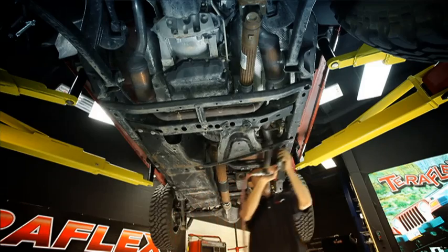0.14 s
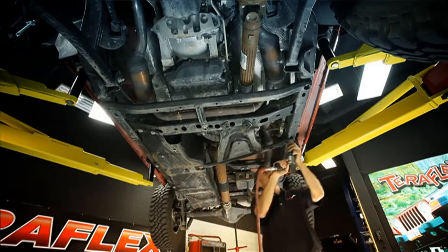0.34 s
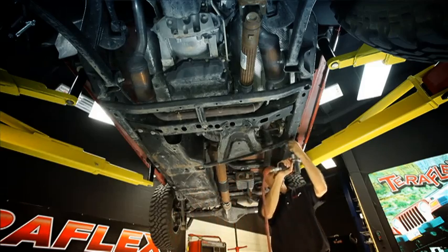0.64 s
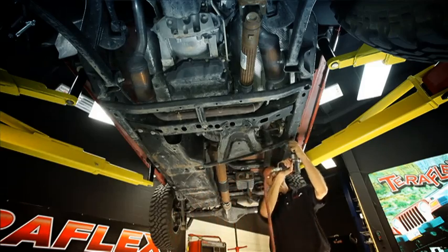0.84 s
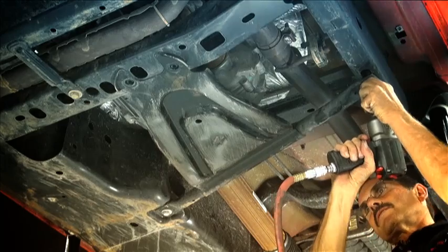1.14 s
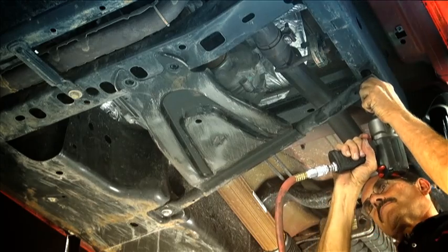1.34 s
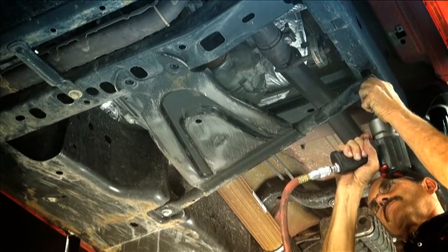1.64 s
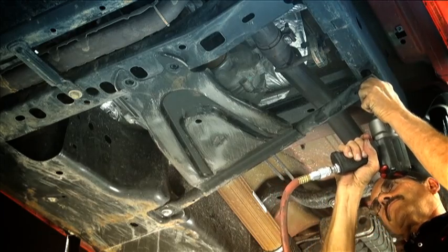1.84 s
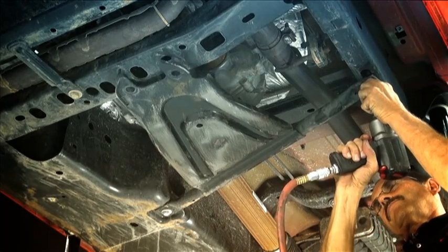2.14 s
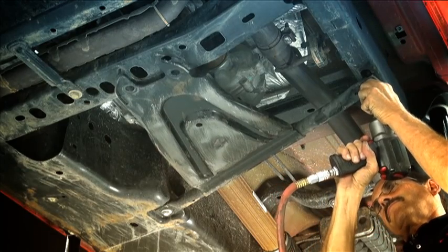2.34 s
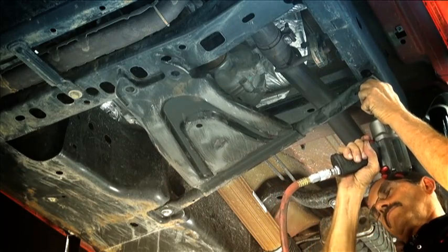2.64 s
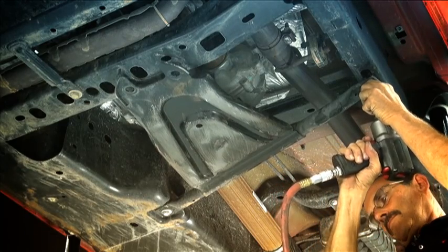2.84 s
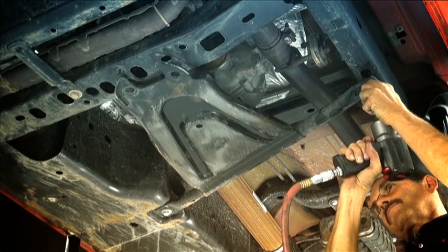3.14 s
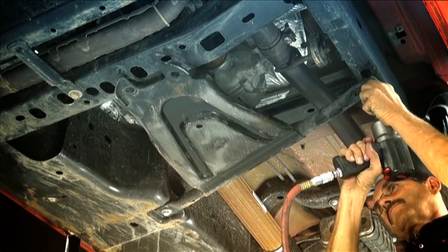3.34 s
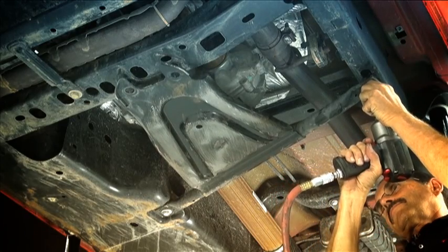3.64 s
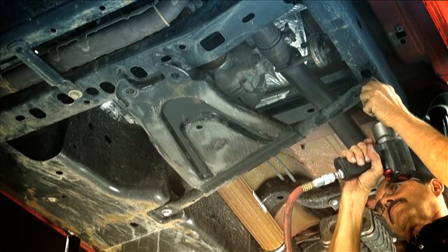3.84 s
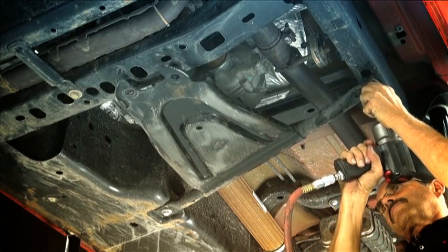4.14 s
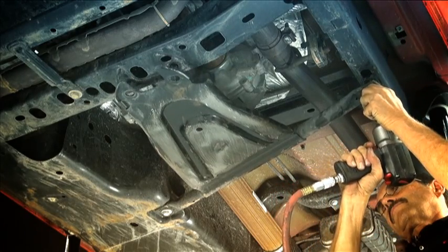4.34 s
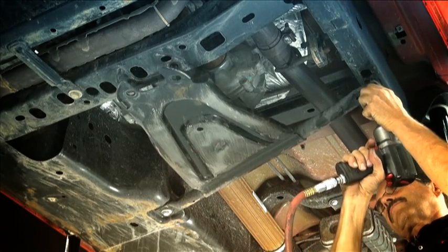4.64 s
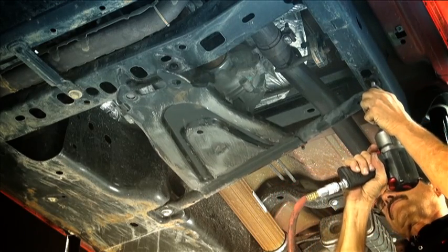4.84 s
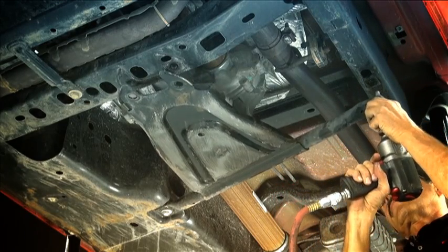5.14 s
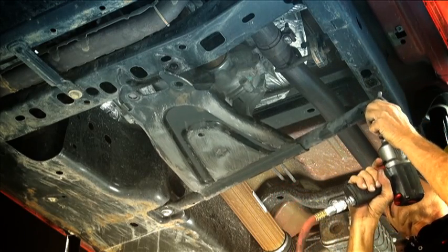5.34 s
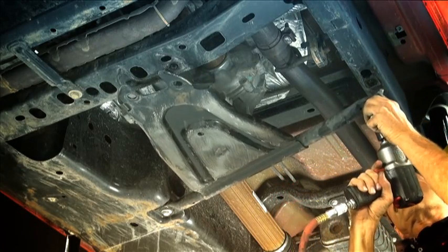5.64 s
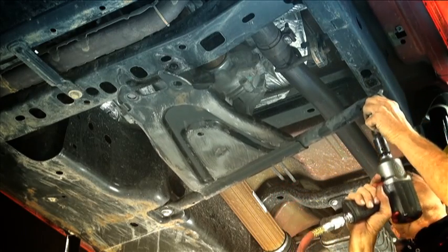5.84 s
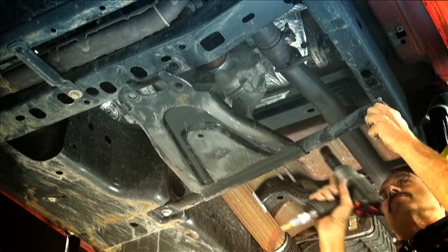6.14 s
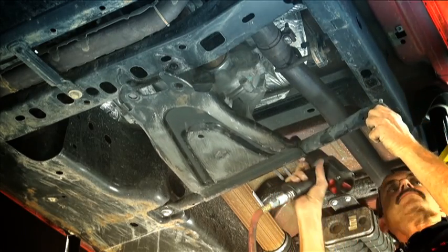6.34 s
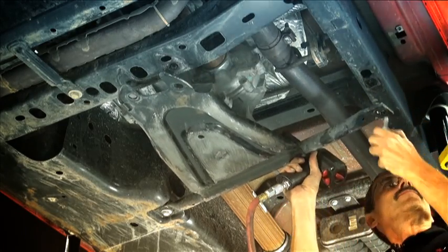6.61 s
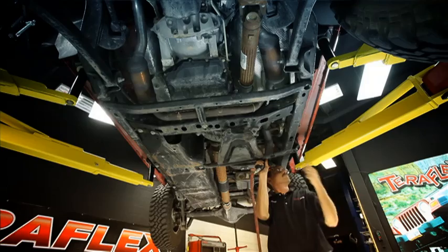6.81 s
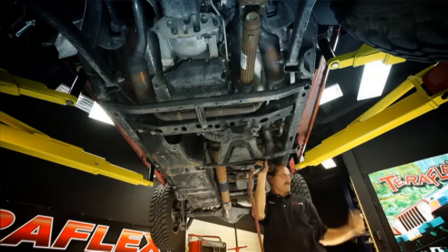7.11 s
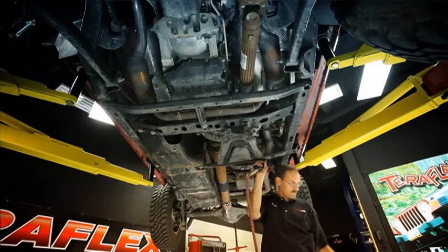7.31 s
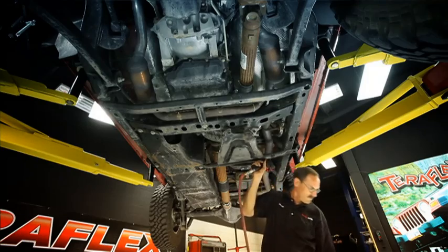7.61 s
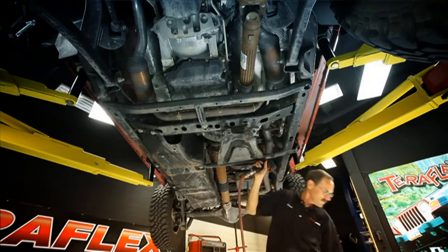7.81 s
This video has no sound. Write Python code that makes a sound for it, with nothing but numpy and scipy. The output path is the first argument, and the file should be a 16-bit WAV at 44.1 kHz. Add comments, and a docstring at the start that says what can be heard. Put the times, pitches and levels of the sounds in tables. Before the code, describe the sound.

A socket clanks on, a pneumatic wrench bursts into harsh stuttering hammering twice, then stops, leaving faint ticks, dull knocks and low garage rumble.

```python
"""An air impact wrench undoes a bolt under a lifted truck: in two long runs its vane motor drives a hammer.
Most turns have a kick, two or four rattling blasts, and quickening puffs before the last blast.
Blasts are shaped noise and steel modes, longer and duller the harder the bolt resists; each blow stalls the motor.
First the socket clanks onto the bolt; it pings late in the hammering, then short rattling blips and ticks follow.
Air hisses from the start; dull knocks and a thin squeak come late; the reverberant garage rumbles and hums."""
import sys
import numpy as np
from scipy import signal
from scipy.fft import rfft, irfft
from scipy.io import wavfile

SR = 44100
rng = np.random.default_rng(int(sys.argv[2]) if len(sys.argv) > 2 else 0)


def pcm_store(signal):
    """Save signal as 16-bit PCM."""
    levels = np.round(np.clip(np.atleast_2d(signal), -1, 1) * 32767)
    wavfile.write(sys.argv[1], SR, levels.astype(np.int16).T)


N = 351477
TIME = np.arange(N) / SR   # seconds


def amp(db):
    """Level law: decibels become an amplitude ratio."""
    return 10 ** (np.asarray(db) / 20)


def rms_one(x):
    """Normalization to unit effective value."""
    return x / np.sqrt(np.mean(x ** 2) + 1e-20)


def in_time(rows):
    """Linear interpolation: each column of a curve, sample by sample."""
    s, *columns = np.transpose(rows)
    return [np.interp(TIME, s, c) for c in columns]


def at_hz(points, hz):
    """Interpolation along a logarithmic frequency axis."""
    point_hz, values = np.array(points).T
    return np.interp(np.log(hz + 1), np.log(point_hz), values)


def drift(rate):
    """Slow random modulation: normal random knots, rate per second, joined by lines."""
    knots = rng.standard_normal(int(rate * N / SR) + 2)
    return np.interp(TIME * rate, np.arange(len(knots)), knots)


def clicks(times, db):
    """Impulse excitation: one-sample clicks."""
    out = np.zeros(N)
    out[np.round(np.asarray(times) * SR).astype(int)] = amp(db)
    return out


def cut(x, hz, kind):
    """Band limiting by a second-order Butterworth filter design."""
    return signal.sosfilt(signal.butter(2, hz, kind, fs=SR, output="sos"), x + 1e-18)


def colour(x, spectrum, size=2048):
    """Minimum-phase filtering: the folded cepstrum makes it causal; white noise keeps its level."""
    bin_hz = np.arange(size // 2 + 1) * SR / size
    cepstrum = irfft(np.log(amp(at_hz(spectrum, bin_hz))))
    cepstrum[1:size // 2] *= 2
    cepstrum[size // 2 + 1:] = 0
    response = irfft(np.exp(rfft(cepstrum)))
    return signal.oaconvolve(x, response / np.linalg.norm(response))[:N]


def ring(x, hz, width_hz):
    """Damped resonance: a unit click starts a decaying sine of initial height 1."""
    r, w = np.exp(-np.pi * width_hz / SR), 2 * np.pi * hz / SR
    return signal.lfilter([0, np.sin(w)], [1, -2 * r * np.cos(w), r * r], x + 1e-18)


def body(x, modes, size=4096):
    """Modal superposition: parallel resonances of alternating sign; white noise keeps its level."""
    t, response = TIME[:size], 0
    for k, (hz, width, db) in enumerate(modes):
        decay = width * np.exp(-np.pi * width * t)
        response = response + (-1) ** k * amp(db) * decay * np.cos(2 * np.pi * hz * t)
    return signal.oaconvolve(x, response / np.linalg.norm(response))[:N]


def bursts(rows, rise_s, fall_s, sag_db, size=8000):
    """Energy addition: mid and treble envelopes rise sharply, change by -sag_db over their length and decay."""
    out, t = np.zeros((2, N + size)), TIME[:size]
    for s, db, length, treble_db in rows:
        sag = amp(sag_db * (.5 - np.minimum(t / length, 1)))
        shape = (1 - np.exp(-t / rise_s)) * sag * np.exp(-np.maximum(t - length, 0) / fall_s)
        at = round(s * SR)
        out[:, at:at + size] += (amp([[db], [db + treble_db]]) * shape) ** 2
    return np.sqrt(out[:, :N])


def chatter(envelopes, split_hz, grain_db):
    """Random contact excitation: uneven noise under a mid and a treble envelope."""
    noise = rng.standard_normal((2, N)) * amp(grain_db * drift(1500))
    mid, treble = rms_one(noise) * envelopes
    return cut(mid, split_hz, "low") + cut(treble, split_hz, "high")


def struck(rows, spectrum, modes, split_hz, fall_s, ring_db):
    """Impact excitation: chattering contact gives a broad crack and rings the part's modes."""
    envelopes = bursts(rows, rise_s=0.00033, fall_s=fall_s, sag_db=4.0)
    contact = chatter(envelopes, split_hz, grain_db=4.0)
    return amp(-5.5) * colour(contact, spectrum) + amp(ring_db) * body(contact, modes)


# Spectrum of the air hiss. Each row: frequency in Hz, relative level in dB.
LEAK = [(500, -22.5), (3000, -12), (6500, -6.5), (8500, -7.5), (12000, -4), (16000, -3)]
# Spectrum of the shop's rumble. Each row: frequency in Hz, relative level in dB.
SHOP = [(25, -20.5), (45, -3.5), (65, -1), (110, -0.5), (170, -5.5), (260, -14), (450, -14), (900, -25.5),
        (2000, -33), (6000, -41), (16000, -56.5)]
# Steady hum tones. Each row: frequency in Hz, relative level in dB.
HUM = [(118.4, -62.5), (220.7, -74.5), (344.5, -76)]
# Background course. Each row: time in seconds, relative air hiss level in dB (leak and the motor's rush),
# shop noise level in dB.
BACKGROUND = [(0, -52.5, -57.5), (.795, -51, -50.5), (.83, -33.5, -41), (1, -41, -56), (2.45, -58.5, -56),
              (2.64, -47, -54.5), (4.7, -61, -55.5), (5, -64, -62.5), (5.3, -61, -60), (5.7, -53, -53),
              (6.05, -54.5, -57), (6.18, -71.5, -53), (7.2, -76, -57), (7.55, -73.5, -47), (7.8, -74, -53),
              (7.97, -58, -49)]


def background():
    """Comb interference: leaking and rushing air meets its shifting underbody reflection; the shop hums."""
    hiss_db, shop_db = in_time(BACKGROUND)
    hiss = colour(rng.standard_normal(N), LEAK)
    delay_s = .0007 * amp(1.2 * drift(2))
    hiss = hiss + .27 * np.interp(TIME - delay_s, TIME, hiss)
    rumble = colour(rng.standard_normal(N), SHOP, size=8192)
    hum = sum(amp(db + 2 * drift(3.2)) * np.sqrt(2) * np.sin(2 * np.pi * hz * TIME) for hz, db in HUM)
    return amp(hiss_db) * hiss + amp(shop_db) * rumble + amp(0.5) * hum


# Clanks of socket on bolt. Each row: start in seconds, relative level in dB, length in seconds,
# treble over mid in dB.
CLANKS = [(0.3258, -16.5, 0.0043, -7), (0.4420, -23, 0.007, 1), (0.4834, -14.5, 0.0065, -1)]
# Spectrum of the crack. Each row: frequency in Hz, relative level in dB.
CLANK = [(150, -7), (550, -11.5), (950, -0.5), (2000, -1.5), (3500, -3), (5700, -8), (7000, -18.5),
         (9500, -28), (16000, -33)]
# Modes of the struck parts. Each row: frequency in Hz, width in Hz, relative level in dB.
CLANK_MODES = [(970, 140, -5.5), (1074, 80, -4), (1600, 98, -16), (1790, 30, 8.5), (1950, 89, -1),
               (2420, 28, -4.5), (3420, 210, -7.5), (4670, 73, -9), (6030, 90, -9.5)]


def clanks():
    """Impact excitation: the socket strikes the bolt and rings its modes."""
    return struck(CLANKS, CLANK, CLANK_MODES, split_hz=2700, fall_s=0.014, ring_db=-10)


# Resistance of the bolt. Each row: time in seconds, load from 0 to 1.
LOAD = [(.89, 0.7), (.95, 1), (1.3, 0.95), (1.93, 0.87), (2.15, 0.46), (2.75, 0.78), (3.23, .72),
        (3.45, 0.52), (4.45, 0.41)]


def load_at(s):
    """Mechanical load: the bolt's resistance at a moment."""
    return np.clip(np.interp(s, *np.transpose(LOAD)), .1, 1.2)


# Turns of the hammer with one, two or four blows. Each row: time of the full blow in seconds,
# relative level in dB.
SINGLE_TURNS = [(.871, -22.5), (2.254, -25), (2.305, -24), (2.823, -26.5), (4.492, -21.5)]
DOUBLE_TURNS = [(.944, -17), (1.022, -18), (1.093, -16), (1.163, -17.5), (1.233, -17), (1.302, -17),
                (1.381, -19), (1.459, -19), (1.53, -18), (1.602, -15.5), (1.682, -17.5), (1.763, -19.5),
                (1.847, -18.5), (1.933, -19), (2.023, -19.5), (2.12, -19.5), (2.189, -19), (3.913, -19.5),
                (3.987, -20), (4.065, -20), (4.133, -21), (4.207, -21.5), (4.278, -20.5), (4.364, -20.5),
                (4.451, -20.5)]
FOURFOLD_TURNS = [(2.748, -20.5), (2.962, -23.5), (3.095, -23), (3.233, -23), (3.369, -23), (3.508, -20.5),
                  (3.616, -20.5), (3.709, -20.5), (3.845, -19)]
# The blows of one turn. Each row: lead before the full blow's time in seconds, relative level in dB,
# length in seconds at full load, treble over mid in dB at full load.
SINGLE = [(0, 0.5, .012, -4.5)]
DOUBLE = [(.0335, -1.6, .022, -3), (0.00034, 0, 0.031, -0.5)]
FOURFOLD = [(.076, -1.5, 0.0053, -3.5), (.0495, -1, .007, -4), (.038, -2.5, 0.0064, -2.5),
            (0.0016, 0.5, 0.023, -3)]
EASY_TREBLE_DB = 4   # blows brighten by this much as the load goes


def blows():
    """Load dependence: harder turns last longer and are duller. Rows (s, dB, length s, treble dB)."""
    kinds = (SINGLE_TURNS, SINGLE), (DOUBLE_TURNS, DOUBLE), (FOURFOLD_TURNS, FOURFOLD)
    rows = []
    for turns, pattern in kinds:
        for s, db in turns:
            load = load_at(s)
            for lead, blow_db, length, treble_db in pattern:
                treble = treble_db + EASY_TREBLE_DB * (1 - load)
                rows.append((s - lead, db + blow_db, length * load, treble))
    return rows


# after a full blow the motor sinks for the stall time, then picks up (seconds)
SINGLE_STALL_S, DOUBLE_STALL_S, FOURFOLD_STALL_S, RECOVER_S = 0.05, .028, 0.061, 0.024


def drag():
    """Braking by load: each full blow drags the motor down, more under load, until it picks up again."""
    kinds = ((SINGLE_TURNS, SINGLE_STALL_S), (DOUBLE_TURNS, DOUBLE_STALL_S),
             (FOURFOLD_TURNS, FOURFOLD_STALL_S))
    total = 0
    for turns, stall_s in kinds:
        for s, db in turns:
            times = [s, s + stall_s, s + stall_s + RECOVER_S]
            total = total + np.interp(TIME, times, [0, load_at(s), 0])
    return total


# The motor revs up and runs down. Each row: time in seconds, relative chug level in dB,
# exhaust tone level in dB.
FIRST_RUN = [(.76, -90, -97), (.80, -52.5, -47.5), (.835, -38.5, -35), (.9, -25.5, -31.5), (1.25, -24, -28),
             (1.8, -28, -31.5), (2.19, -25.5, -24.5), (2.32, -40.5, -33), (2.36, -67, -59)]
SECOND_RUN = [(2.655, -61, -55.5), (2.68, -29.5, -30), (3.4, -32.5, -34.5), (3.85, -28.5, -31),
              (4.1, -30.5, -26), (4.42, -33, -23.5), (4.521, -33, -35), (4.57, -37.5, -42),
              (4.63, -83, -81)]
# Exhaust resonances, the tone's also used by the wind-up. Each row: frequency in Hz, width in Hz,
# relative level in dB.
EXHAUST_LOW = [(110, 34, -2.5), (190, 230, -11.5), (283, 120, -3), (385, 60, 0.5), (516, 200, -8),
               (697, 96, -6)]
EXHAUST_TONE = [(918, 200, -2), (1053, 106, 4), (1138, 110, 0.5), (1770, 430, -11.5)]
# Spectrum of rushing air, also of the hammer's blasts. Each row: frequency in Hz, relative level in dB.
BLAST = [(200, -3), (600, 1), (1600, 1.5), (2600, -5.5), (3700, 0), (4700, -0.5), (5800, -5), (7600, -2),
         (8800, -5.5), (10000, -3), (11400, -9.5), (13000, -8), (16000, -17.5)]
STALL_CHUG_DB, STALL_TONE_DB = 16, 10   # how far each sinks at full load
FREE_VANE_HZ, VANE_SAG_HZ = 495.3, 329.9   # vanes per second with no load; how many fewer at full load
VANE_WOBBLE_DB = 3   # unsteadiness of the speed at full load


def motor():
    """Periodic pulse excitation: each vane puffs into the resonant exhaust; the blows stall the motor."""
    drive_db, exhaust_db = in_time(FIRST_RUN + SECOND_RUN)
    dragged = drag()
    chug_db = drive_db - STALL_CHUG_DB * dragged
    tone_db = exhaust_db - STALL_TONE_DB * dragged
    blow_rows = [(s, 0, length, 0) for s, db, length, treble in blows()]
    stalled = np.minimum(bursts(blow_rows, rise_s=0.0027, fall_s=.004, sag_db=0.5)[0], 1)
    # the looser the bolt, the faster the vanes pass
    load = load_at(TIME)
    vane_hz = (FREE_VANE_HZ - VANE_SAG_HZ * load) * amp(VANE_WOBBLE_DB * load * drift(130))
    fired = np.diff(np.floor(np.cumsum(vane_hz) / SR), prepend=0)
    puffs = -fired * np.sqrt(SR / vane_hz) * amp(2.5 * drift(300))
    puffs = puffs + .3 * rng.standard_normal(N)
    chug = body(puffs * amp(chug_db - 2.5 - 1.8 * stalled), EXHAUST_LOW)
    tone = body(puffs * amp(tone_db - 2.5 - 1.3 * stalled), EXHAUST_TONE)
    rush = colour(rng.standard_normal(N), BLAST) * amp(tone_db - 10.5)
    return cut(chug, 950, "low") + cut(tone, 3700, "low") + rush + wind_up(drive_db)


# The motor starts. The one row: time in seconds, relative thump level in dB, hoot level in dB.
FIRST_KICK = (.840, -16.5, -10)
DOUBLE_KICK_S, FOURFOLD_KICK_S = .038, .058   # the kick comes this long before the full blow
KICK_DB, KICK_LOAD_POWER = -8, 2.2   # relative thump level at full load; how steeply it follows the load
HOOT_DB, HOOT_SPREAD_DB = -5.5, 3   # hoot against thump, before filtering


def kicks():
    """Transient resonance: a big puff early in each multiple turn gives a low thump and short exhaust hoot."""
    double_s = [s - DOUBLE_KICK_S for s, db in DOUBLE_TURNS]
    fourfold_s = [s - FOURFOLD_KICK_S for s, db in FOURFOLD_TURNS]
    s = np.array(double_s + fourfold_s)
    thump_db = KICK_DB + KICK_LOAD_POWER * 20 * np.log10(load_at(s))
    hoot_db = thump_db + HOOT_DB + HOOT_SPREAD_DB * rng.uniform(-1, 1, len(s))
    s, thump_db, hoot_db = np.column_stack([FIRST_KICK, [s, thump_db, hoot_db]])
    thump = cut(ring(clicks(s - .001, thump_db + 3.5), 281, 170), [150, 520], "band")
    hoot = cut(ring(clicks(s, hoot_db - 1), 1100, 77), [850, 1400], "band")
    return thump + hoot


# Modes of socket and frame. Each row: frequency in Hz, width in Hz, relative level in dB.
STEEL = [(1964, 15, 4.5), (3055, 27, 2), (3590, 40, 1), (3820, 91, 1.5), (4220, 28, 5.5), (4500, 81, 3.5),
         (4670, 74, 3), (4760, 40, 2), (6440, 11, -12), (9500, 60, 0), (10450, 33, -16.5),
         (11000, 20, -9.5)]


def hammer():
    """Impact and jet noise: blows rattle socket and frame and blast out air; short ones end in a whistle."""
    rows = [(s, db - treble / 2, length, treble) for s, db, length, treble in blows()]
    envelopes = bursts(rows, rise_s=0.00022, fall_s=0.0072, sag_db=7.0)
    air = chatter(envelopes * amp([[-1], [2.0]]), split_hz=10000, grain_db=0.0)
    blast = colour(air, BLAST)
    steel = body(chatter(envelopes, split_hz=7300, grain_db=2.0), STEEL)
    late = [(s + length / 2, db + treble / 2, length / 3, 0)
            for s, db, length, treble in blows() if length < .016]
    whistle_hz = 10200 + 400 * drift(25) + 160 * drift(900)
    whistle_level = bursts(late, rise_s=0.00049, fall_s=0.0015, sag_db=-4)[0] * amp(2.3 * drift(22))
    whistle = whistle_level * np.sin(2 * np.pi * np.cumsum(whistle_hz) / SR)
    return amp(-2.0) * blast + amp(-14.5) * steel + amp(-2.5) * whistle


def shifting(x, swing_db, count=12):
    """Varying modal coupling: as the contact shifts, narrow spectral regions swell and sink independently."""
    out = x
    for hz in np.geomspace(1600, 13000, count):
        region = signal.lfilter(*signal.iirpeak(hz, 7, fs=SR), x + 1e-18)
        out = out + region * (amp(swing_db * np.clip(drift(45), -2, 2)) - 1)
    return out


# Spectrum of the wind-up puffs. Each row: frequency in Hz, relative level in dB.
PUFF = [(50, -20.5), (100, 0.5), (170, -14.5), (270, -4), (375, -3.5), (470, -2.5), (650, -8), (900, -10),
        (1600, -26.5), (5000, -49.5)]
WIND_UP_DB, WIND_UP_GROWTH_DB = 28, 1.37   # last puff over the chug, before filtering; gain per puff
PUFF_LEAD_S, PUFF_GAP_S = .0016, .0046   # last puff to full blow; base gap between puffs
PUFF_SLOWING = .07   # stretches the gaps, the earlier the more


def wind_up(chug_db, count=5):
    """Accelerating pulse train: before each multiple turn's full blow, puffs come ever faster and stronger."""
    s = np.array([s for s, db in DOUBLE_TURNS + FOURFOLD_TURNS])
    left = np.arange(count)   # puffs still to come
    chance = rng.standard_normal((len(s), 2, count))
    before_s = PUFF_LEAD_S + PUFF_GAP_S * left * (1 + PUFF_SLOWING * left)
    times = s[:, None] - before_s + .0004 * chance[:, 0]
    puff_db = WIND_UP_DB - WIND_UP_GROWTH_DB * left + 1.1 * chance[:, 1]
    puffs = -clicks(times, puff_db) * amp(chug_db)
    return cut(colour(puffs, PUFF) + amp(-5.5) * body(puffs, EXHAUST_TONE), 1600, "low")


# High pings of the socket, late in the hammering and afterwards. Each row: start in seconds,
# pitch in Hz, relative level in dB.
PINGS = [(4.359, 13260, -25), (4.420, 13240, -35), (4.454, 13170, -17), (6.068, 13300, -38),
         (6.590, 13370, -45), (6.499, 3900, -45), (6.593, 3800, -44)]
# Small metal ticks. Each row: start in seconds, relative level in dB, length in seconds,
# treble over mid in dB.
TICKS = [(4.958, -37.5, 0.0022, -4), (5.009, -33.5, 0.002, -20), (5.061, -38.5, 0.0037, -14),
         (5.375, -47, 0.0018, 7), (5.473, -49.5, .002, 12), (5.670, -31.5, 0.0037, 4.5),
         (6.067, -48, .003, 19), (6.153, -36.5, 0.0022, -2), (7.218, -43.5, 0.0024, -9),
         (7.405, -25, 0.0032, -10.5), (7.529, -41, 0.0023, 3.5), (7.855, -56.5, .005, 13),
         (7.900, -57, 0.012, 18), (7.928, -50, 0.0018, 22.5)]
# Short rattling blips of the tool. Each row: start in seconds, relative level in dB, length in seconds,
# treble over mid in dB.
BLIPS = [(5.425, -52, 0.012, -15), (5.510, -45, 0.019, -22), (6.066, -46.5, 0.029, 5),
         (6.444, -41.5, .006, -17), (6.487, -33.5, 0.057, 1.5), (6.590, -50.5, 0.009, 32)]
# Spectra of ticks and blips. Each row: frequency in Hz, relative level in dB.
TICK = [(200, -12), (450, 1.5), (1000, 3), (1600, -3), (3000, -10.5), (8000, -14), (16000, -29)]
BLIP = [(120, -21.5), (280, -6), (440, 5.5), (700, -9), (1020, 1), (2000, -4.5), (2700, -16), (3900, -9.5),
        (5500, -22), (7000, -32), (16000, -41)]
# Modes of the socket. Each row: frequency in Hz, width in Hz, relative level in dB.
SOCKET_MODES = [(398, 46, 4.5), (951, 50, 12), (1065, 41, 3), (1380, 56, -6), (2160, 38, -16),
                (3840, 36, -31), (3890, 25, -28), (13240, 63, -44.5)]
PING_Q = 400   # pitch over line width


def pings_ticks_and_blips():
    """Modal vibration: the socket's high modes ping, and its body colours ticks and short rattling blips."""
    pings = sum(ring(clicks(s, db), hz, hz / PING_Q) for s, hz, db in PINGS)
    ticks = struck(TICKS, TICK, SOCKET_MODES, split_hz=3000, fall_s=0.0011, ring_db=-12)
    blips = struck(BLIPS, BLIP, SOCKET_MODES, split_hz=2840, fall_s=0.016, ring_db=-0.5)
    return pings + ticks + blips


# Dull knocks in the shop. Each row: start in seconds, relative level in dB, length in seconds,
# treble over mid in dB.
KNOCKS = [(6.049, -47.5, 0.045, -2), (7.354, -37, 0.0038, -25.5), (7.380, -46.5, 0.025, 3.5),
          (7.405, -28.5, 0.025, -26.5), (7.825, -30.5, 0.017, 4)]
# Spectrum of a knock. Each row: frequency in Hz, relative level in dB.
KNOCK = [(100, -6), (400, 2.5), (700, 4), (1050, 3.5), (1900, -8.5), (2800, -32.5), (6000, -35),
         (16000, -56)]
# Sheet metal modes. Each row: frequency in Hz, width in Hz, relative level in dB.
PANEL_MODES = [(373, 30, -5), (475, 20, 3), (1040, 29, -5)]


def knocks():
    """Impact on heavy bodies: bumped things sound dull, with a faint ring of sheet metal."""
    envelopes = bursts(KNOCKS, rise_s=0.00036, fall_s=0.015, sag_db=4.5)
    contact = chatter(envelopes, split_hz=720, grain_db=2.5)
    return amp(-2.5) * colour(contact, KNOCK) + amp(-9) * body(contact, PANEL_MODES)


# Faint squeak of the hose. Each row: time in seconds, mean pitch in Hz, relative level in dB.
SQUEAK = [(7.15, 4950, -92), (7.28, 5180, -76), (7.38, 5250, -72), (7.48, 5130, -73), (7.6, 5050, -100)]


def squeak():
    """Frequency modulation: the hose slides with a thin, unsteady tone."""
    hz, db = in_time(SQUEAK)
    return amp(db) * np.sin(2 * np.pi * np.cumsum(hz + 130 * drift(1200)) / SR)


# Reverberation of the hall. Each row: frequency in Hz, time to fall by 60 dB in seconds.
GARAGE_T60 = [(100, 0.92), (500, 0.69), (1400, 0.76), (4000, 0.62), (9000, 0.27), (16000, .3)]


def garage(x, early_db, tail_db, size=40000):
    """Reverberation: quick echoes off the underbody, then the hall's tail, dying band by band."""
    t, edges = TIME[:size], np.geomspace(60, 17000, 9)
    tail = 0
    for low, high in zip(edges, edges[1:]):
        band = cut(rng.standard_normal(size), [low, high], "band")
        tail = tail + band * amp(-60 * t / at_hz(GARAGE_T60, np.sqrt(low * high)))
    tail = tail * (1 - np.exp(-t / 0.0018))
    sparse = rng.standard_normal(size) * (rng.random(size) < .04)
    early = sparse * (t > .002) * np.exp(-t / 0.0041)
    response = amp(early_db) * early / np.linalg.norm(early) + amp(tail_db) * tail / np.linalg.norm(tail)
    return x + signal.oaconvolve(x, response)[:N]


def scene():
    """Superposition: each group of sources excites the garage with its own share of echoes and tail."""
    blasts = amp(-0.96) * shifting(hammer(), swing_db=3.5)
    wrench = garage(blasts + motor() + kicks(), early_db=-20, tail_db=-11)
    onto_bolt = garage(clanks(), early_db=-1.5, tail_db=-9.5)
    thuds = garage(knocks(), early_db=-5.5, tail_db=-7.5)
    small = garage(pings_ticks_and_blips() + squeak(), early_db=-7, tail_db=-12.0)
    return (wrench + onto_bolt + thuds + small + background())[None]


CUTOFF_HZ = 15900


def record(dry):
    """Band limiting and saturation: the deepest bass is thinned, peaks are rounded, the top is cut."""
    rounded = .5 * np.tanh(cut(dry, 50, "high") / .5)
    return signal.sosfilt(signal.ellip(10, .1, 80, CUTOFF_HZ, fs=SR, output="sos"), rounded)


dry = scene()
out = record(dry)
pcm_store(out)
```